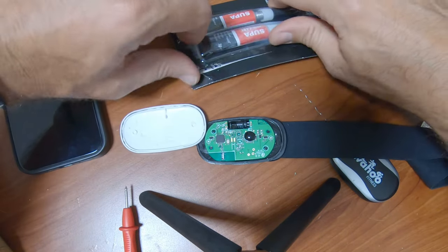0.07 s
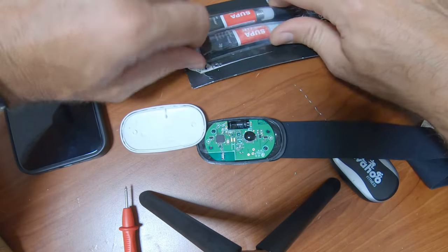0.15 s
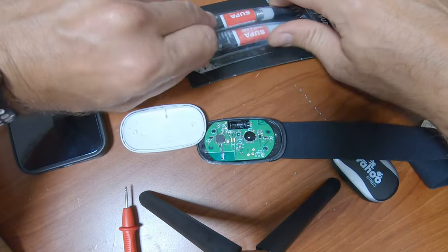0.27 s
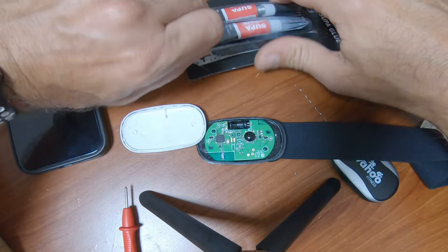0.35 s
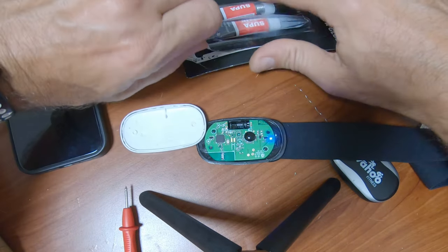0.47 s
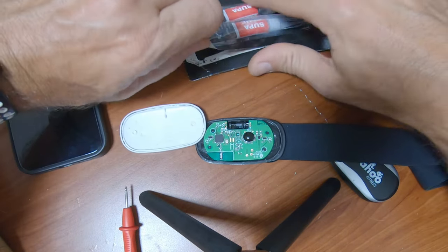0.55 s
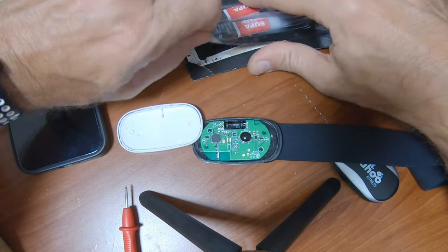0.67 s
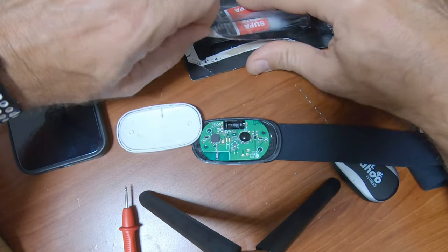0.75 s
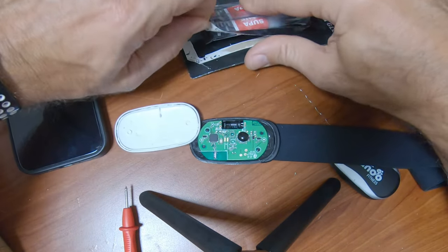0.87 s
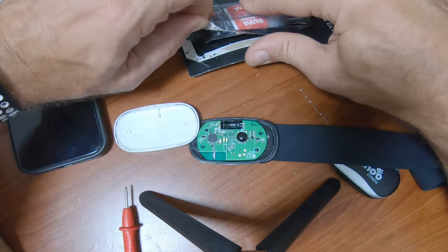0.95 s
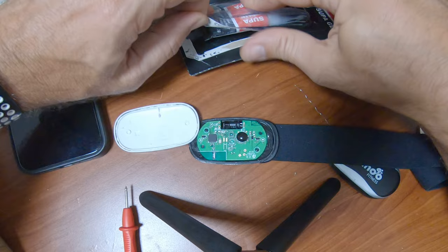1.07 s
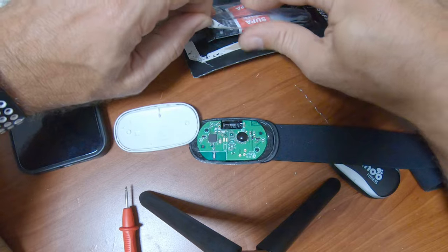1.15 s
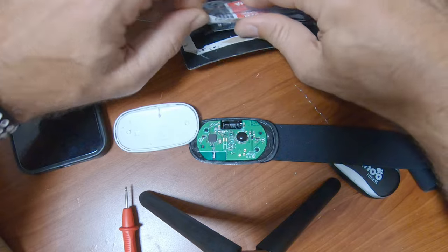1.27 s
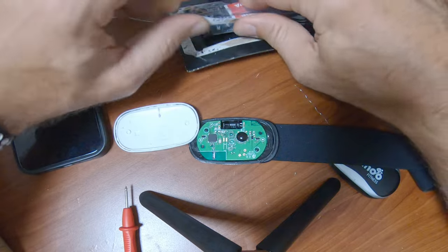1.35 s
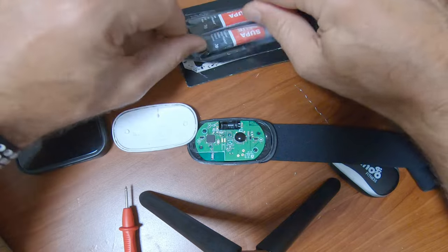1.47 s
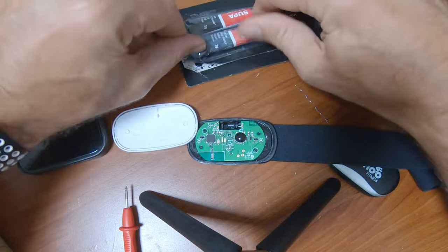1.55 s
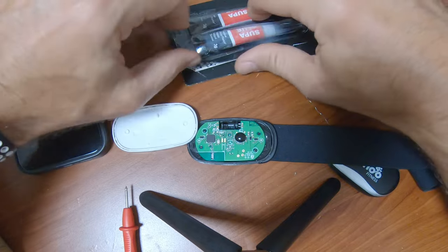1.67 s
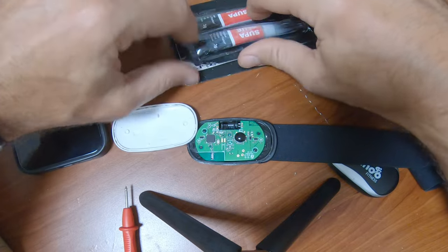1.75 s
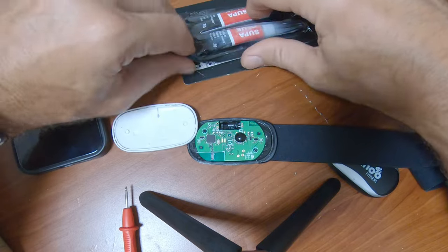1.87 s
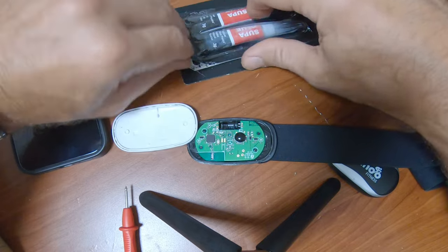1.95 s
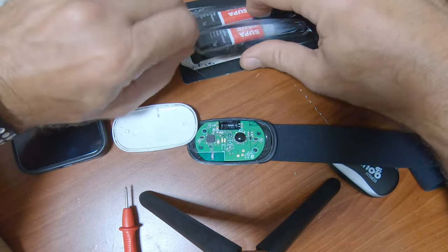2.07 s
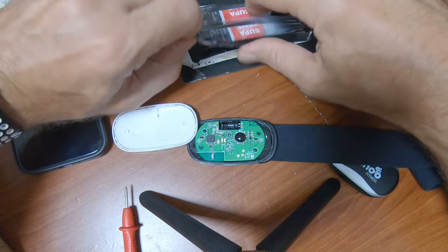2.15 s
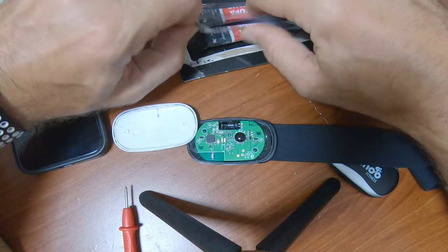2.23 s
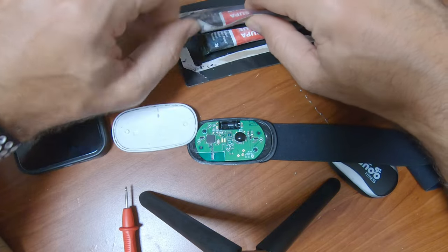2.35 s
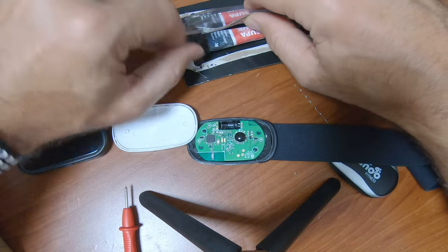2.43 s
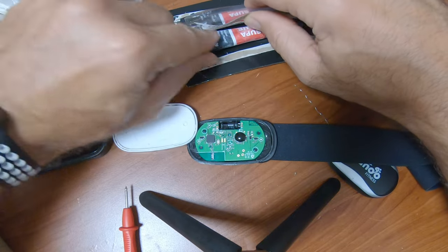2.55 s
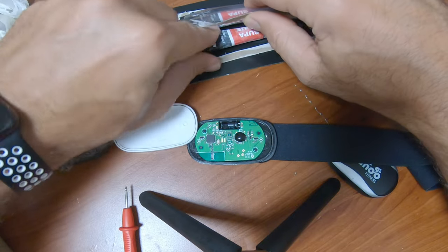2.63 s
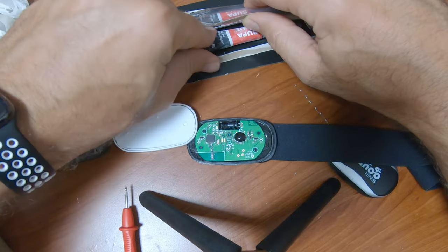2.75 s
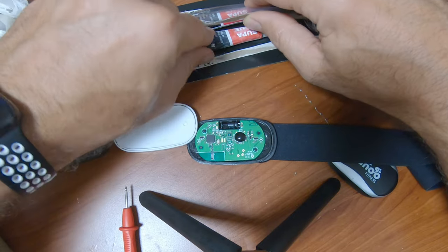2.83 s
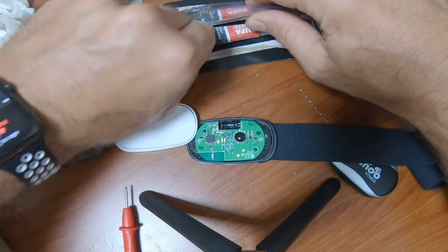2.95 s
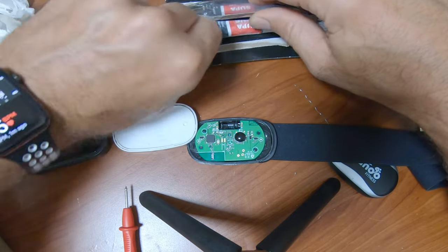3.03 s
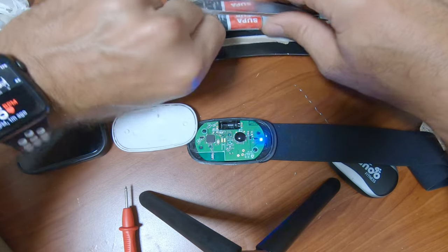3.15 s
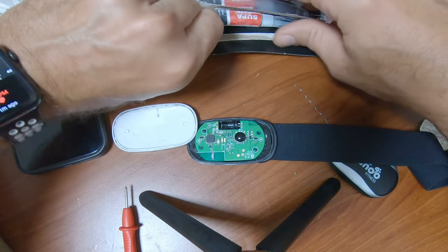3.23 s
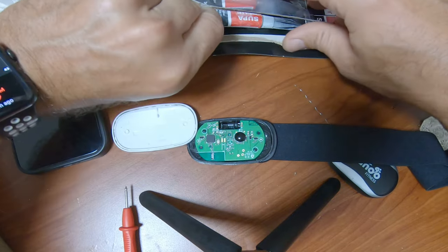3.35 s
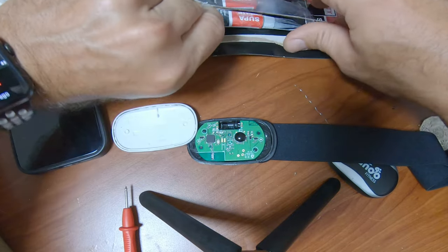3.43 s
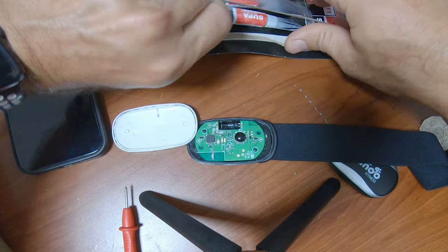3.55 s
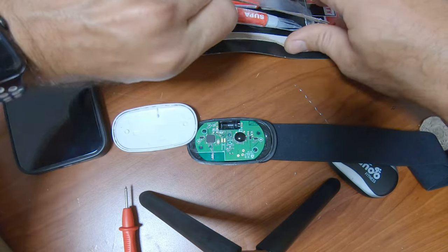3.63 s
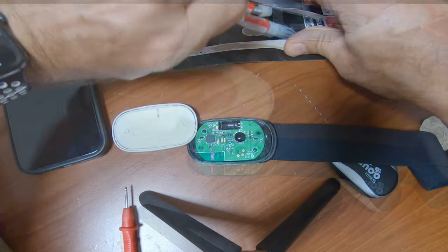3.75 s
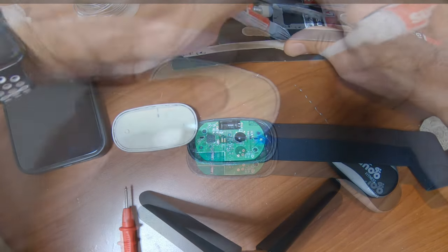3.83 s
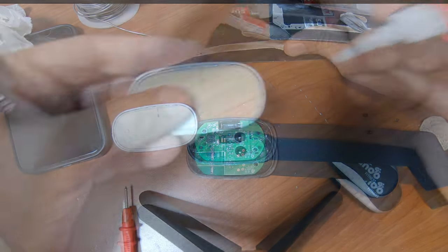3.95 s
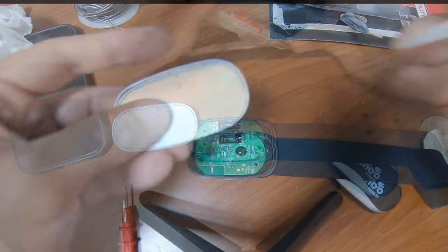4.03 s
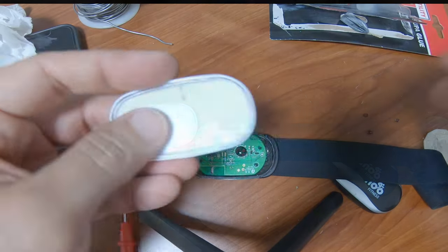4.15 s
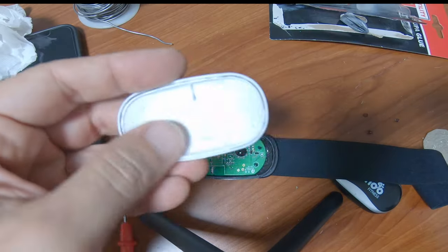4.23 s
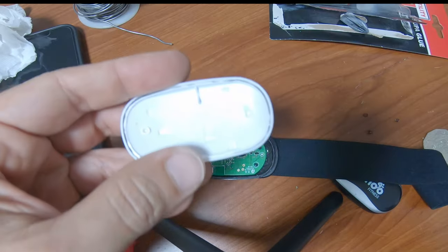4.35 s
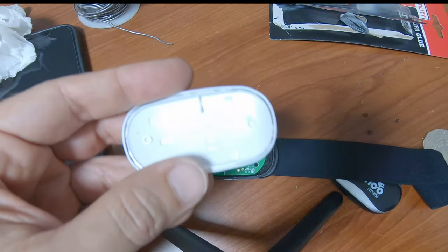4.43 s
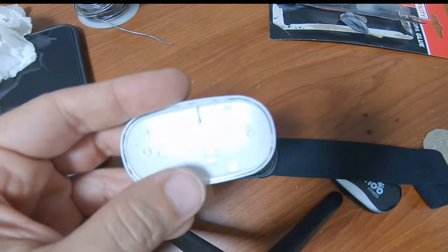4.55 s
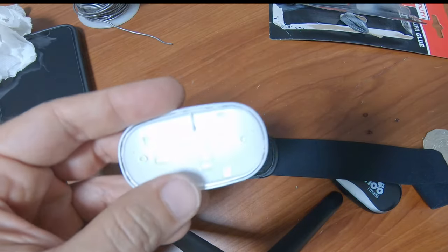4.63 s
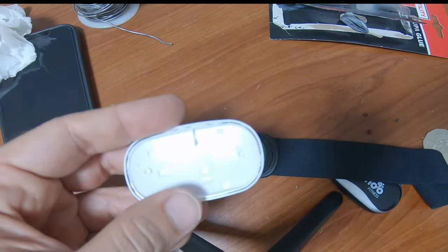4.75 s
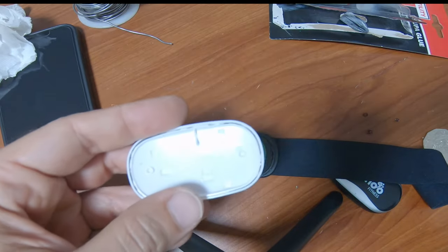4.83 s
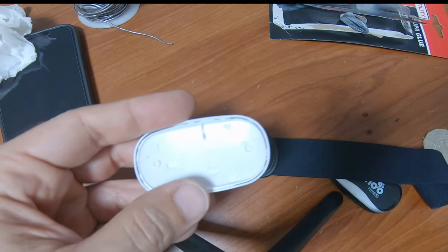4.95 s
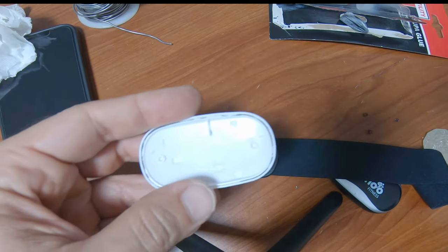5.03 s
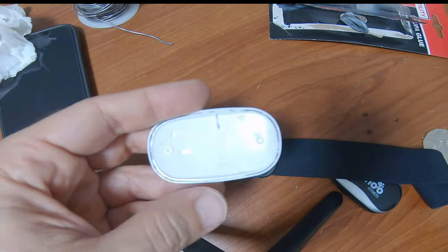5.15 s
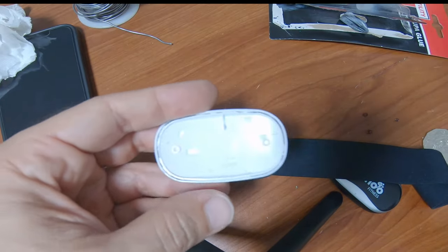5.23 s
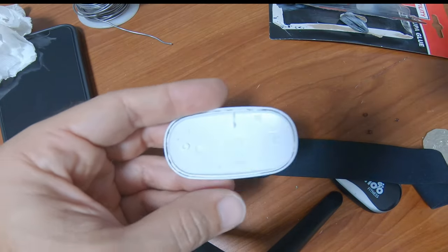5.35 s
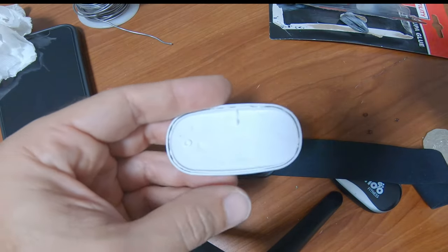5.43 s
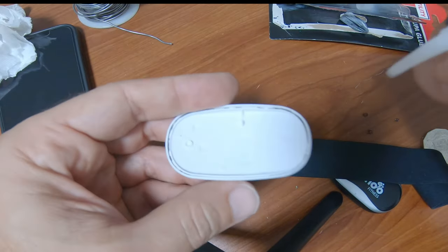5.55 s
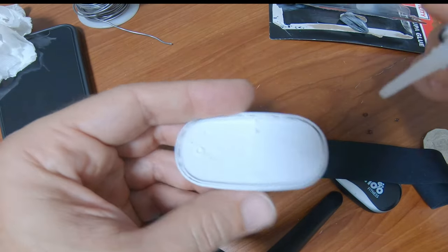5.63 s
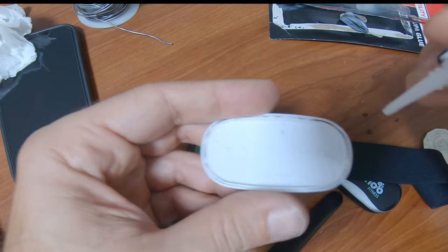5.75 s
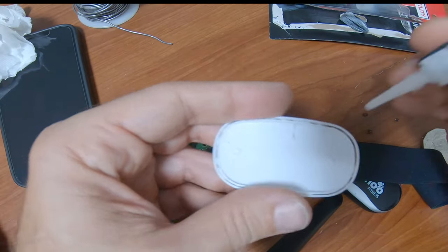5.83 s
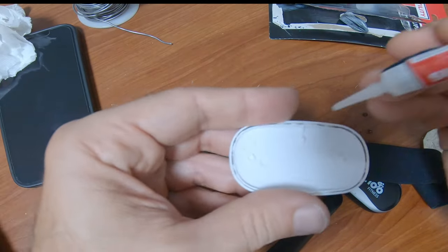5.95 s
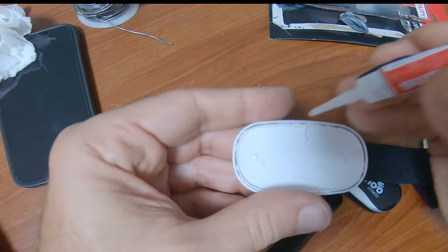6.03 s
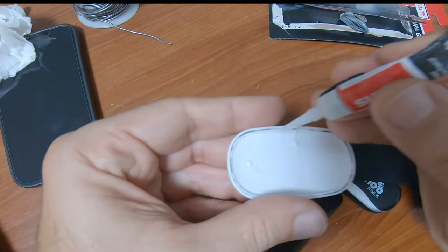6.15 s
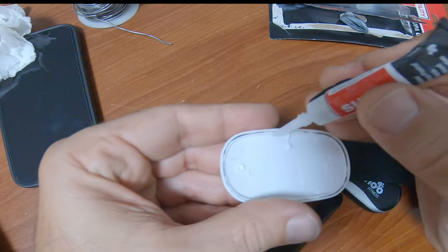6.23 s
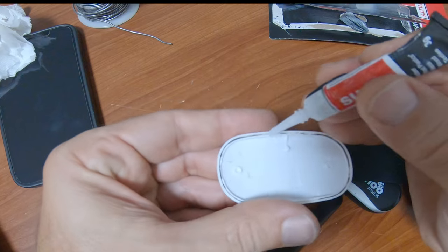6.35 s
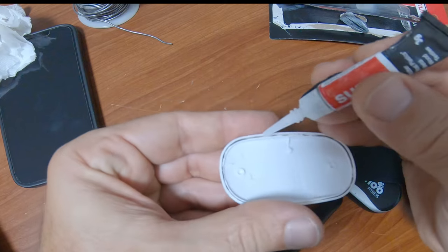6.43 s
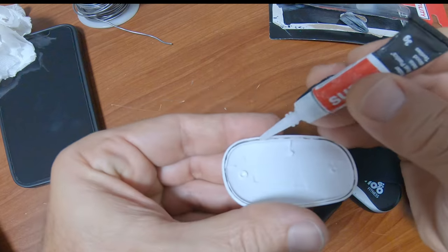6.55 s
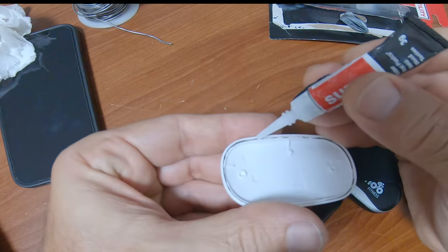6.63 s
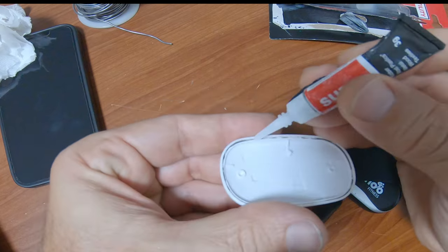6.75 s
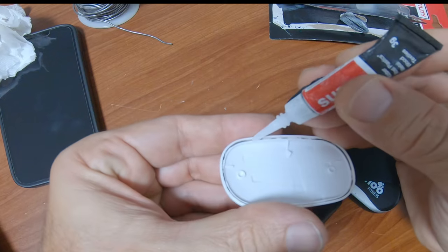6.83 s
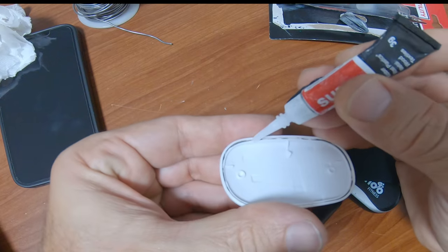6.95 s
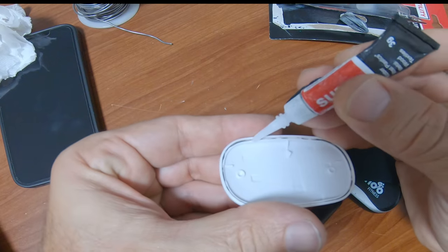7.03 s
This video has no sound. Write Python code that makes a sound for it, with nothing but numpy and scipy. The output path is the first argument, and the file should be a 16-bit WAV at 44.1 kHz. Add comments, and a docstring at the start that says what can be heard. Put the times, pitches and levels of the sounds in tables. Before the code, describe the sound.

A close stereo microphone on a desk stand, in a small room with a short echo and faint low hum. From 0 to 1.5 s, stiff plastic packaging is wrenched from card: hard, bright snaps at 0.15 and 0.23, a dense cluster from 0.55 to 0.85, a tiny creak near 1.3, then another tight cluster at 1.35-1.5 with a low bump. Fibrous tearing swells around 1.6, then lulls. A duller ripping burst comes at 2.15-2.4, followed by sparse small crinkles, a short squeak and sharp snap at 3.1, and more tearing to 3.4. The hardest cracks and a heavy dull thump land at 3.7-3.8, with the last ripping around 4.0 and a softer bump. Then near quiet: light finger rub at 4.3, double low knock with dry ticks at 4.9, faint hissing strokes at 5.7 and 6.0-6.3, a soft low bump at 6.6, and a barely audible tick at 6.9.

```python
"""A quiet room hum and the low shudders of a desk stand run throughout, while card fibres crackle as they tear.
Hands are peeling a plastic blister off its card on a wooden desk, just under a camera on the stand.
The plastic snaps in ringing bursts of noise, a small room answers with fading noise, and glue rips or squeaks.
Bumps on the desk ring the stand as dying sine waves; later fingers slide over a smooth plastic lid as
hissing, stuttering noise, among small dry ticks."""
import sys
import numpy as np
from scipy import signal
from scipy.fft import rfft, irfft, next_fast_len
from scipy.io import wavfile
from scipy.ndimage import uniform_filter1d, map_coordinates

SR = 44100
rng = np.random.default_rng(int(sys.argv[2]) if len(sys.argv) > 2 else 0)


def master_out(mix):
    """Clip the mix to full scale and print it as 16-bit PCM to the path in sys.argv[1]."""
    frames = np.transpose(np.atleast_2d(mix))
    ceiling = np.clip(frames, -1, 1)
    pcm = np.round(ceiling * 32767).astype(np.int16)
    wavfile.write(sys.argv[1], SR, pcm)


N = 312669  # length in samples


def amp(db):
    """Turn dB into a plain multiplier."""
    return 10 ** (np.asarray(db) / 20)


def unit(x):
    """Scale a signal to an rms of 1."""
    return x / np.sqrt(np.mean(x ** 2) + 1e-20)


def along(points, hz):
    """Read a curve of (Hz, value) points on a log frequency axis."""
    f, v = np.transpose(points)
    return np.interp(np.log(hz + 1), np.log(f + 1), v)


def at_time(points, s):
    """Read a curve of (seconds, value) points, holding its end values."""
    return np.interp(s, *np.transpose(points))


def gain(points):
    """One multiplier per sample from (seconds, dB) points, silent outside them."""
    s, db = np.transpose(points)
    return amp(np.interp(np.arange(N) / SR, s, db, -200, -200))


def wobble(rate):
    """A smooth random curve with this many random knots a second."""
    knots = rng.standard_normal(int(N * rate / SR) + 4)
    return map_coordinates(knots, [np.arange(N) * rate / SR])


def filtered(x, response):
    """Filter a signal by multiplying its spectrum by a function of frequency."""
    m = next_fast_len(x.shape[-1] + 8192)  # spare room for the filter to ring out
    spectrum = rfft(x, m) * response(np.fft.rfftfreq(m, 1 / SR))
    return irfft(spectrum, m)[..., :x.shape[-1]]


def peak(f, hz, width):
    """A causal resonance with a gain of 1 at its centre."""
    return 1j * f * width / (hz * hz - f * f + 1j * f * width)


def cliff(f, hz):
    """A steep causal low-pass."""
    return signal.freqs(*signal.butter(5, hz, analog=True), f)[1]


def paired(pair, spectrum, alike):
    """Colour two unrelated signals and mix them so left and right are as alike as asked at each frequency."""
    def turn(hz):
        return np.arccos(np.clip(along(alike, hz), -1, 1)) / 2
    mid, side = filtered(pair, lambda hz: spectrum(hz) * [np.cos(turn(hz)), np.sin(turn(hz))])
    return np.array([mid + side, mid - side])


def rush(spectrum, alike, lumps=1):
    """Coloured stereo noise of rms 1 whose loudness follows lumps."""
    return unit(paired(lumps * rng.standard_normal((2, N)), lambda hz: amp(along(spectrum, hz)), alike))


def grains(rate, spread_db, t60):
    """Loudness of many tiny breaks: sudden starts of very unequal size, each dying fast."""
    sizes = amp(np.minimum(spread_db * rng.exponential(size=N), 11.5))
    starts = (rng.random(N) < rate / SR) * sizes
    decay = amp(-60 / (t60 * SR))  # t60: seconds to fall by 60 dB
    return 1 + signal.lfilter([1], [1, -decay], starts)


def patchy(x, depth_db):
    """Drifting colour: random gain in smooth patches of time and frequency."""
    z = signal.stft(x, nperseg=512)[2]
    field = uniform_filter1d(rng.standard_normal(z.shape[1:]), 5, 0)
    field = uniform_filter1d(field, 8, 1)
    return unit(signal.istft(z * amp(depth_db * unit(field)), nperseg=512)[1][:, :N])


# How strong the stand's shudder is. Each row: time in seconds, relative level in dB.
SHUDDER_LEVEL = [(0.0, -47), (0.51, -45), (1.07, -58.5), (1.36, -51.5), (3.34, -49.5), (3.45, -58),
                 (4.64, -68), (4.91, -49), (6.54, -57.5), (6.6, -39.5), (6.77, -39), (7.09, -58.5)]
# Colour of the shudder. Each row: frequency in Hz, relative level in dB per Hz.
SHUDDER_COLOUR = [(9, -26), (16, 0.5), (40, -4.5), (60, -12.5), (85, -28), (130, -54.5), (240, -120)]
# Colour of the room hum. Each row: frequency in Hz, relative level in dB per Hz.
HUM_COLOUR = [(70, -18), (119, -16.5), (167, -7), (321, -15), (490, -20), (868, -13.5), (1300, -25.5),
              (2110, -31.5), (3510, -34.5), (11000, -44), (14300, -77.5), (22000, -120)]
# Stereo spread of the hum. Each row: frequency in Hz, left-right likeness (1 same, -1 opposite).
HUM_ALIKE = [(60, 0.38), (180, 0.69), (550, -0.87), (4970, 0.091), (15000, -0.94)]
HUM_DB, SHUDDER_SWING_DB = -57.5, 3.5  # mean hum level; how far one unit of wobble swings the shudder


def background():
    """Room hum, and the stand never quite at rest: two slowly varying low noises."""
    swing = amp(SHUDDER_SWING_DB * wobble(7.2))
    shudder = amp(7.5) * gain(SHUDDER_LEVEL) * rush(SHUDDER_COLOUR, [(30, 0.3)], swing)
    shudder = shudder * amp([[-.6], [.6]])  # a little stronger on the right
    hum = amp(HUM_DB + 0.46 * wobble(0.62)) * rush(HUM_COLOUR, HUM_ALIKE)
    return shudder + hum


# How hard the card is pulled. Each row: time in seconds, relative crackle level in dB.
PULL = [(0.0, -50), (.25, -40.5), (0.406, -46.5), (0.578, -40), (0.698, -37.5), (0.748, -31.5),
        (0.908, -41.5), (1.2, -49), (1.326, -45), (1.47, -42.5), (1.62, -30.5), (1.72, -39), (1.8, -49.5),
        (2.05, -51), (2.154, -31.5), (2.27, -34.5), (2.328, -23.5), (2.496, -42), (2.922, -43), (3.09, -40),
        (3.14, -30), (3.27, -27), (3.406, -41.5), (3.55, -54), (3.73, -40.5), (4.046, -29.5),
        (4.245, -42.5), (4.29, -53)]
# How bright the pack sounds. Each row: time in seconds, relative treble over the crackle in dB.
BRIGHTNESS = [(.2, -14.5), (.38, -11.5), (.47, -13), (.7, -0.5), (1.06, -15.5), (1.5, -2), (1.7, -13),
              (2.05, -23), (2.3, -22), (3.2, -29), (3.55, -32), (3.73, -11), (4.05, -17)]
# How hard the pack bears on the desk. Each row: time in seconds, relative level in dB.
BEARING = [(0, -56), (1.0, -56.5), (1.85, -63.5), (2.1, -49), (3.0, -51.5), (3.35, -50.5), (3.7, -43),
           (4.05, -56), (4.35, -54.5)]
# When the freed film relaxes with a smoother rustle. Each row: start in seconds, end in seconds.
RELAX = [(1.46, 1.78), (3.135, 3.26), (3.98, 4.35)]
# Colours of card, film and dragging on the desk. Each row: frequency in Hz, relative level in dB per Hz.
CARD_COLOUR = [(290, -37), (500, -16.5), (878, 2), (1530, -2), (1700, 3), (3160, -2.5), (4450, -3.5),
               (5610, -22.5), (7000, -40), (11300, -30.5), (14100, -35), (16000, -44.5)]
FILM_COLOUR = [(2820, -33.5), (4800, -2), (6970, -5.5), (9860, -11.5), (11000, -25.5), (14400, -29),
               (16000, -40.5)]
DRAG_COLOUR = [(47, -34.5), (80, 4), (317, 3), (485, -9), (800, -12), (1040, -31), (1760, -120)]
# Stereo spread of the pack close by. Each row: frequency in Hz, left-right likeness (1 same, -1 opposite).
NEAR_ALIKE = [(60, 0.97), (250, 0.53), (600, 0.87), (1200, 0.097), (3000, 0.93), (6000, 0.33),
              (10000, 0.076)]
DRAG_FOLLOWS, PULL_MID_DB = .6, -35.5  # dB of drag per dB of crackle, around this middling pull
RELAX_GRAIN = .3  # power that flattens the grains while the film relaxes


def tear():
    """Card fibres and film crackle together as many tiny breaks; the pack drags on the desk."""
    card_level = gain(PULL)
    film_level = card_level * gain(BRIGHTNESS)
    drag_level = gain(BEARING) * (card_level / amp(PULL_MID_DB)) ** DRAG_FOLLOWS
    lumps = grains(rate=400., spread_db=3.8, t60=.006) * amp(2.2 * wobble(30))
    t = np.arange(N) / SR
    relaxed = sum((t > start) & (t < end) for start, end in RELAX)
    lumps = lumps ** np.where(relaxed, RELAX_GRAIN, 1)
    card = amp(1.5) * card_level * patchy(rush(CARD_COLOUR, NEAR_ALIKE, lumps), depth_db=2.5)
    film = amp(4.0) * film_level * rush(FILM_COLOUR, NEAR_ALIKE, np.sqrt(lumps))
    drag = amp(10.0) * drag_level * rush(DRAG_COLOUR, NEAR_ALIKE, amp(4.5 * wobble(35)))
    return card + film + drag


# Ceiling on the thin fizz above the edge of a snap. Each row: time in seconds, relative level in dB.
FIZZ = [(0.3, -44), (.55, -30), (1.6, -26.5), (2.2, -27)]
CLIFF_HZ, EDGE_CLIFF_HZ = 5800, 11000  # where the broad shell sound and the bright edge end
THUD_DB, THUD_HZ, BEARING_MID_DB = 15.5, 288, -51.5  # desk thud over a snap's body, at a middling bearing


def snaps(events, alike, broad, first, width):
    """Each snap is a burst of micro-cracks ringing the bit of plastic that gave way and nudging the desk."""
    out, t = np.zeros((2, N + SR)), np.arange(3072) / SR
    for s, db, hz, treble_db, body_db, t60 in events:
        fade = amp(-60 * t / np.clip(t60, .004, .09))
        cracks = rng.standard_normal((2, len(t))) * fade * (1 - np.exp(-t / 0.001))
        cracks[0, :2] += first * np.array([1, -.4])  # the first break is the sharpest
        fizz_db = min(treble_db, at_time(FIZZ, s))
        thud_db = body_db + THUD_DB + at_time(BEARING, s) - BEARING_MID_DB

        def colour(f):
            ring = peak(f, hz, width * hz) * peak(f, hz, 0.94 * hz)
            shell = ring + broad * peak(f, 2380, 2700) ** 2 * cliff(f, CLIFF_HZ)
            edge = amp(treble_db + 12.0) * peak(f, 5300, 6100) ** 2 * cliff(f, EDGE_CLIFF_HZ)
            fizz = amp(fizz_db) * peak(f, 12500, 5000) ** 2
            body = amp(body_db + 23.5) * peak(f, 440, 700) ** 2
            thud = amp(thud_db) * peak(f, THUD_HZ, 200) ** 2
            return (shell - edge - fizz - body) * peak(f, 2154, 6300) ** 3 + thud

        burst = paired(cracks, colour, alike)
        out[:, round(s * SR):][:, :len(t)] += amp(db) * burst / np.abs(burst).max()
    return out[:, :N]


# The plastic buckling. Each row: time in seconds, peak level in dB, ring in Hz, relative body level in dB,
# time for the burst to fall by 60 dB in seconds (held between 0.004 and 0.09 when played).
SNAPS = [(0.053, -25, 2300, -30, 0.0085), (0.138, -28, 2650, -38, 0.015), (0.151, -5.5, 2940, -27, 0.016),
         (0.227, -1, 2500, -26.5, 0.023), (0.371, -19, 2290, -17, 0.013), (0.504, -18, 1150, -15.5, 0.033),
         (0.541, -19, 3530, -48, 0.028), (0.574, -2.5, 2300, -23, 0.015), (0.691, -12, 2066, -42, 0.039),
         (0.714, -6.5, 4330, -22, 0.024), (0.737, -5, 2180, -12.5, 0.019), (0.772, -4.5, 1970, -18, 0.012),
         (0.845, -0.5, 1860, -29.5, 0.0096), (1.117, -21.5, 1120, -17, 0.049),
         (1.28, -24.5, 1040, -8, 0.12), (1.331, -17.5, 4960, -24, 0.075),
         (1.341, -10.5, 2020, -13.5, 0.011), (1.392, -8, 3070, -30, 0.058), (1.4, -3.5, 2180, -15, 0.011),
         (1.426, -12, 4600, -13, 0.062), (1.444, 0, 2220, -17.5, 0.011), (1.449, -2, 2186, 0.5, 0.011),
         (1.498, -1, 4440, -26, 0.012), (1.798, -19, 2660, -26.5, 0.044), (1.9, -22, 2600, -15, 0.052),
         (2.116, -20, 2150, -37, 0.009), (2.152, -7, 2500, -22, 0.036), (2.258, -19.5, 2570, -30, 0.0065),
         (2.303, -1, 1070, -20, 0.022), (2.366, -11.5, 960, -9, 0.012), (2.42, -16, 1030, -22, 0.027),
         (2.523, -12.5, 2580, -18.5, 0.045), (2.663, -22, 3100, -30, 0.03),
         (2.695, -21.5, 2160, -14, 0.023), (2.712, -21, 2030, -12.5, 0.015), (2.727, -22, 1098, -6, 0.014),
         (2.829, -23.5, 980, -17, 0.061), (2.924, -16, 2640, -13, 0.027), (3.017, -23.5, 869, 9, 0.072),
         (3.043, -15.5, 2750, -33, 0.016), (3.075, -19, 840, 3, 0.011), (3.12, -1, 2923, -27, 0.015),
         (3.27, -10, 2100, -12, 0.0083), (3.349, -12.5, 2580, -15.5, 0.033), (3.368, -17, 1930, -12, 0.027),
         (3.432, -20.5, 2520, -15, 0.033), (3.593, -19.5, 2310, -16.5, 0.043),
         (3.717, -1.5, 2780, -32.5, 0.017), (3.775, -0.5, 2430, -16.5, 0.02), (3.797, -4, 2550, 11, 0.14),
         (3.908, -16.5, 2525, -10, 0.037), (3.971, -6.5, 855, -22, 0.015)]
SNAP_TREBLE_DB = -8  # treble of a snap over the brightness
CREAK_S, CREAK_COUNT, CREAK_GAP_S = 1.2935, 7, .005  # glue slips in a quick, nearly even run
CREAK_DB, CREAK_HZ, CREAK_T60, CREAK_BODY_DB = -20, 5500, .004, -40  # mean peak, ring, fade in s, body


def pack_snaps():
    """Plastic snaps are as bright as the crackle around them; one run of glue slips creaks."""
    slips = []
    for k in range(CREAK_COUNT):
        slip_s = CREAK_S + CREAK_GAP_S * (k + rng.normal(0, 0.051))
        slips.append((slip_s, CREAK_DB + rng.normal(0, 2.2), CREAK_HZ, CREAK_BODY_DB, CREAK_T60))
    s, db, hz, body_db, t60 = np.transpose(SNAPS + slips)
    treble_db = SNAP_TREBLE_DB + at_time(BRIGHTNESS, s)
    return snaps(zip(s, db, hz, treble_db, body_db, t60), NEAR_ALIKE, broad=0.5, first=6, width=.4)


# How fast the room's echoes die. Each row: frequency in Hz, time to fall by 60 dB in seconds.
ROOM_FADE = [(200, 0.13), (2000, 0.33), (5000, 0.28), (12000, 0.022)]


def room(x):
    """The room answers with noise whose frequencies die at their own speeds; a new tail each quarter second."""
    out, hop = np.zeros((2, N + SR)), SR // 4
    for a in range(0, N, hop):
        hz, t, z = signal.stft(rng.standard_normal((2, SR // 2)), SR, nperseg=256)
        fade = amp(-60 * t / along(ROOM_FADE, hz)[:, None])
        tail = signal.istft(z * fade, SR, nperseg=256)[1]
        tail = tail + 1.3 * tail[::-1]  # close ports share part of their echoes
        tail = tail / np.linalg.norm(tail[0])
        wet = signal.fftconvolve(x[:, a:a + hop].mean(0)[None], tail, axes=1)
        out[:, a + 200:][:, :wet.shape[1]] += wet  # starts 200 samples late
    return filtered(out[:, :N], lambda f: 1 / (1 + (f / 6000) ** 4))


# Bumps on the desk. Each row: time in seconds, relative knock level in dB, frequency the blow favours in Hz,
# relative sway level in dB, relative rattle level in dB, share of the free ring time left by resting hands.
BUMPS = [(0.559, -21, 88, -27, -12, 1), (1.471, -2, 92.3, -26, -28.5, 0.34),
         (1.527, -23.5, 105, -40, -43, 0.7), (1.573, -15, 82, -35, -44, .2), (3.774, 5, 220, -14.5, -11, 1),
         (4.086, -4.5, 107, -26, 0.5, 1), (4.875, -1, 138, 0, -8.5, 0.77),
         (4.937, 1, 140.3, -11.5, -11.5, 0.73), (4.993, -18, 145, -50, -20.5, 0.95),
         (6.58, -27, 170, -24.5, -43, 0.74)]
# Ways the stand rings, the first being its sway. Each row: frequency in Hz, free time to fall by 60 dB in
# seconds, left share of the right port's motion.
STAND = [(35.88, 0.24, 0.54), (78.7, 0.34, 0.94), (102.33, 0.4, 0.1), (137.3, 0.1707, 0.042),
         (217, 0.052, 0.085)]
SPREAD_DB = -23.5  # change in level per octave away from the favoured frequency


def bumps():
    """Bumps travel up the stand and shake the right port hardest; loose things rattle."""
    out, t = np.zeros((2, N + SR)), np.arange(SR // 2) / SR
    for s, knock_db, favoured_hz, sway_db, rattle_db, free in BUMPS:
        rattle = rng.standard_normal(len(t)) * amp(-60 * t / 0.22)
        rattle = filtered(rattle, lambda f: peak(f, 350, 170) ** 2)
        bump = amp(rattle_db) * rattle * [[-.5], [1]]
        knocks = [knock_db + SPREAD_DB * abs(np.log2(hz / favoured_hz)) for hz, *_ in STAND[1:]]
        for db, (hz, t60, share) in zip([sway_db] + knocks, STAND):
            fade = amp(db - 60 * t / (free * t60))
            ring = fade * np.sin(2 * np.pi * hz * t) * (1 - np.exp(-t / 0.0079))  # soft start
            bump = bump + ring * [[share], [1]]
        out[:, round(s * SR):][:, :len(t)] += bump
    return out[:, :N]


# Swelling rips of glue and short squeaks. Each row: start in seconds, rise in seconds, fall in seconds,
# relative level in dB, centre in Hz, width in Hz.
RIPS = [(.56, .015, .03, -23, 6800, 1000), (.675, .03, .02, -30, 5000, 4000),
        (1.285, .025, .03, -35, 4800, 4000), (1.413, .02, .024, -12, 4900, 4200),
        (2.07, .09, .05, -34, 2600, 2000), (2.25, .012, .05, -26, 3000, 3000),
        (3.03, .015, .012, -30, 3050, 400), (3.095, .026, .004, -26, 2950, 250),
        (3.095, .024, .006, -26, 4550, 250), (3.768, .017, .045, -14, 2500, 3500),
        (3.771, .005, .03, -34, 12500, 6000), (2.255, .04, .12, -52, 12000, 5000),
        (4.37, .06, .03, -57, 1680, 260)]


def rips():
    """Cracks too dense to count, heard as noise that swells and dies quickly."""
    out, t = np.zeros((2, N)), np.arange(SR // 5) / SR
    stutter = amp(3 * wobble(300))
    for start, rise, fall, db, hz, width_hz in RIPS:
        def colour(f):
            band = peak(f, hz, width_hz) ** 2 * peak(f, 1700, 6860) ** 2
            return abs(band * (cliff(f, EDGE_CLIFF_HZ) + 0.076))

        swell = np.interp(t, [0, rise, rise + fall], [0, 1, 0])
        noise = unit(paired(rng.standard_normal((2, len(t))), colour, NEAR_ALIKE))
        out[:, round(start * SR):][:, :len(t)] += amp(db) * swell * noise
    return out * stutter


# Fingers sliding on the lid. Each row: start in seconds, length in seconds, level in dB after the rise,
# level in dB before the release, scrape in Hz.
SLIDES = [(4.285, 0.09, -43, -43, 4640), (4.343, 0.13, -53.5, -51, 5900), (5.675, 0.11, -57.5, -55.5, 4000),
          (5.755, 0.09, -55.5, -49.5, 4220), (6.015, 0.05, -42, -46.5, 3530),
          (6.065, 0.118, -49, -55, 4500), (6.19, 0.12, -60.5, -61, 3600)]
# Colour of skin on plastic. Each row: frequency in Hz, relative level in dB per Hz.
SKIN_COLOUR = [(710, -27.5), (1200, -9), (2190, -7), (3000, -2.5), (3600, -3), (4350, -1.5), (5790, -7.5),
               (7960, -6), (10500, -14), (15000, -39)]
SLIDE_RISE_S, SLIDE_FALL_S, SLIDE_EDGE_DB = 0.021, 0.03, -15.5  # edge: level at both ends of a stroke
SCRAPE_DB, SCRAPE_WIDTH_HZ = 6, 470  # the resonance that a stroke picks out


def slides():
    """Skin hisses and stutters over plastic; each stroke sets in and lets go quickly, with its own colour."""
    stutter = amp(1.5 * wobble(25) + 1.5 * wobble(200))
    hiss = patchy(rush(SKIN_COLOUR, [(2000, 0.77), (9000, 0.45)], stutter), depth_db=3.5)
    out = np.zeros((2, N))
    for s, length, first_db, last_db, hz in SLIDES:
        end = s + length
        stroke = gain([(s, first_db + SLIDE_EDGE_DB), (s + SLIDE_RISE_S, first_db),
                       (end - SLIDE_FALL_S, last_db), (end, last_db + SLIDE_EDGE_DB)])
        scrape = filtered(hiss, lambda f: 1 + amp(SCRAPE_DB) * peak(f, hz, SCRAPE_WIDTH_HZ))
        out += stroke * unit(scrape)
    return out


# Small dry contacts on desk and lid. Each row: time in seconds, peak level in dB, ring in Hz, relative treble
# level in dB, time for the burst to fall by 60 dB in seconds (held between 0.004 and 0.09 when played).
TICKS = [(4.8755, -16, 1720, -29, 0.0066), (4.88, -13, 1370, -37.5, 0.07), (4.893, -43, 6000, -3, .015),
         (4.934, -31.5, 1360, -35.5, 0.15), (5.009, -37, 1340, -47, 0.082), (5.511, -46, 1746, -26, 0.033),
         (6.007, -50, 3180, -16.5, 0.0081), (6.024, -34.5, 3300, -25, 0.06), (6.886, -45, 2030, -20, 0.02)]
# Stereo spread of the ticks. Each row: frequency in Hz, left-right likeness (held between -1 and 1).
TICK_ALIKE = [(400, -1.02), (1400, -0.66), (3000, 0.98), (9000, 0.92)]
TICK_BODY_DB = -22.5  # relative body level


def ticks():
    """Small contacts make the same kind of burst as a snap, with a narrower ring."""
    rows = [(s, db, hz, treble_db, TICK_BODY_DB, t60) for s, db, hz, treble_db, t60 in TICKS]
    return snaps(rows, TICK_ALIKE, broad=0.03, first=2, width=.11)


# Where the hands work. Each row: time in seconds, left level over right in dB.
PLACE = [(0, 1), (2.2, -0.55), (7.09, -0.5)]


def scene():
    """Place the hands' sounds, then add the room's answer, ticks, bumps and background."""
    rub = slides()
    pack = pack_snaps() + rips()
    lean = np.sqrt(gain(PLACE))
    hands = (pack + tear() + rub) * [lean, 1 / lean]
    return hands + amp(-10) * room(pack + 0.51 * rub) + ticks() + bumps() + background()


# When the stereo image changes width. The four times in seconds: starts closing, shut, starts opening, open.
NARROW_S = [1.751, 2.45, 3.3, 3.7]
NARROW_DB, BASS_NARROW_DB = -48, -35.5  # change in side level when shut, above and below 200 Hz
SIDE_DB, BASS_SIDE_DB = -0.5, 3.5  # side level when open, above and below 200 Hz


def record(dry):
    """The image narrows for a while; peaks are rounded off at full scale; the highest treble is cut."""
    mid, side = (dry[0] + dry[1]) / 2, (dry[0] - dry[1]) / 2
    shut = np.interp(np.arange(N) / SR, NARROW_S, [0, 1, 1, 0])
    bass = filtered(side, lambda hz: 1 / (1 + (hz / 200) ** 6))
    upper = side - bass
    side = amp(BASS_SIDE_DB + BASS_NARROW_DB * shut ** 2) * bass + amp(SIDE_DB + NARROW_DB * shut) * upper
    both = np.array([mid + side, mid - side])
    rounded = both / (1 + np.abs(both) ** 10) ** (1 / 10)
    return filtered(rounded, lambda hz: hz < 15830)


dry = scene()
out = record(dry)
master_out(out)
```